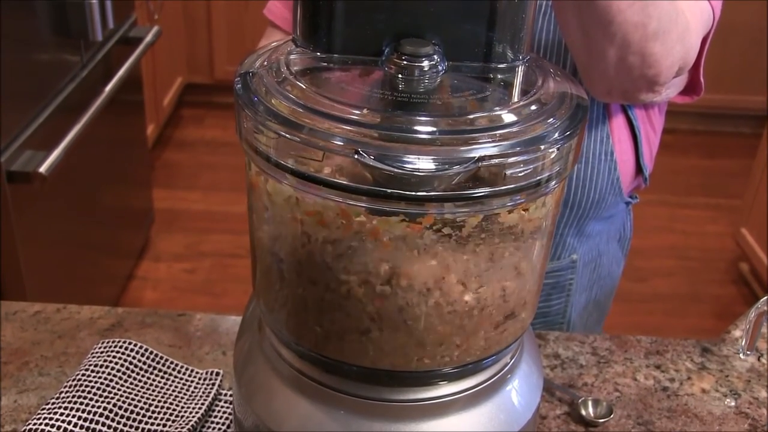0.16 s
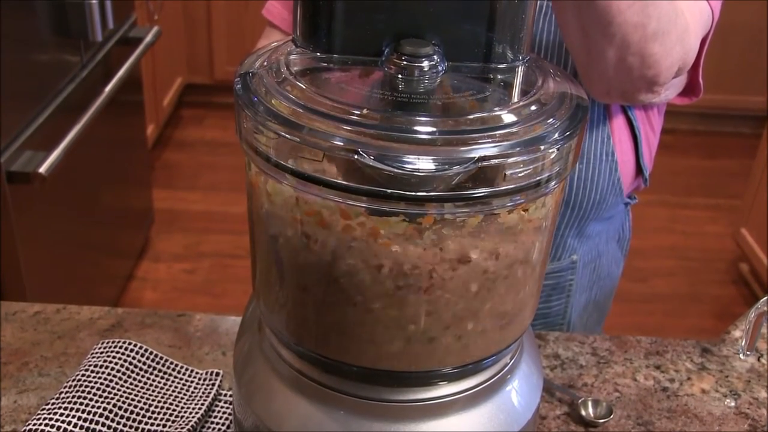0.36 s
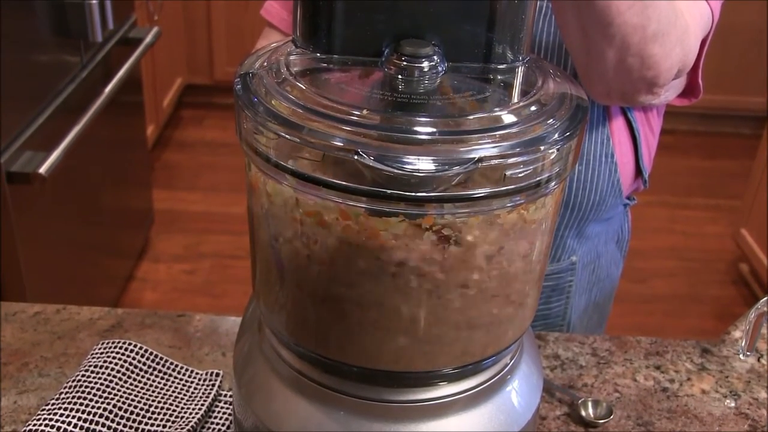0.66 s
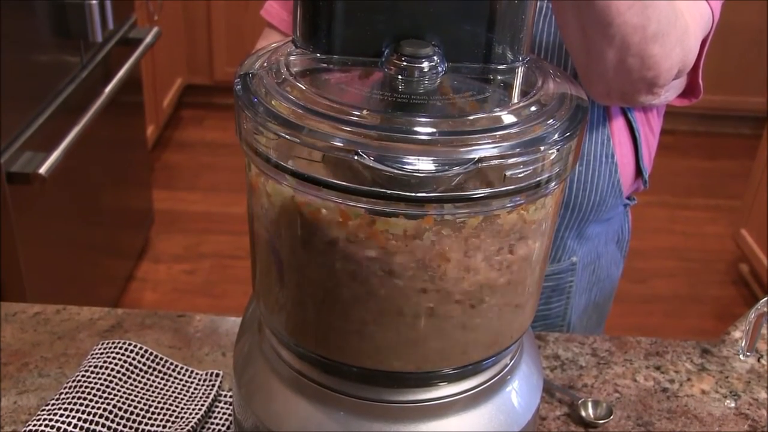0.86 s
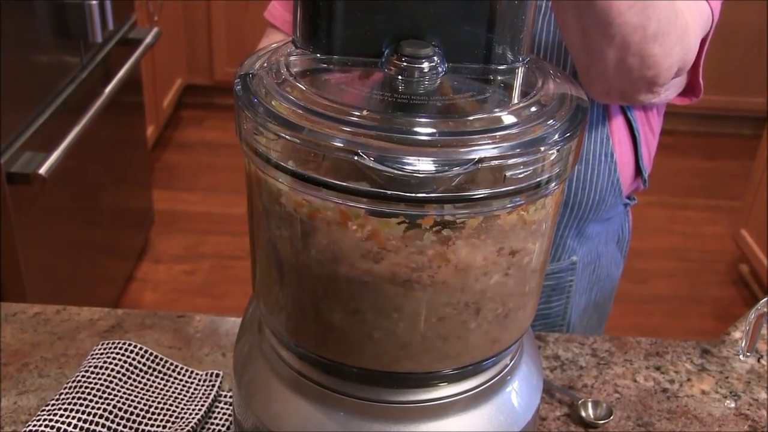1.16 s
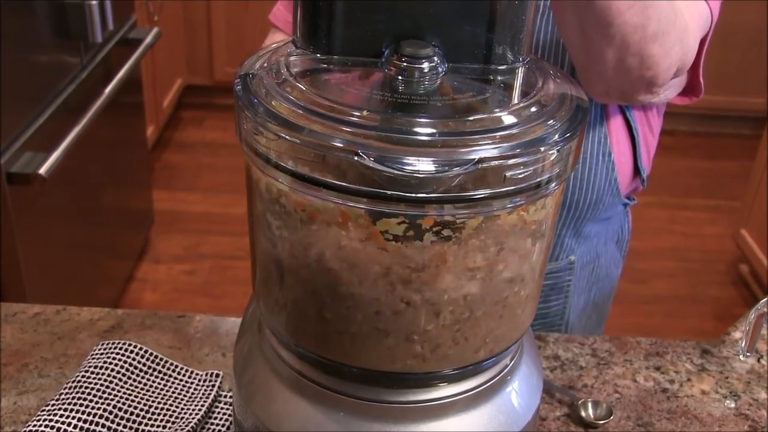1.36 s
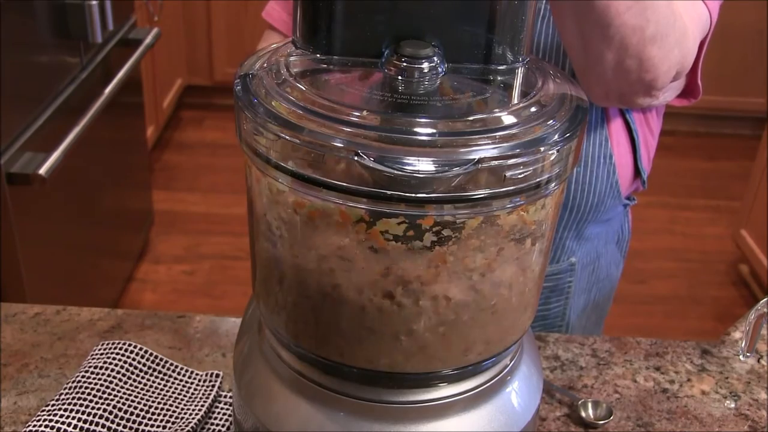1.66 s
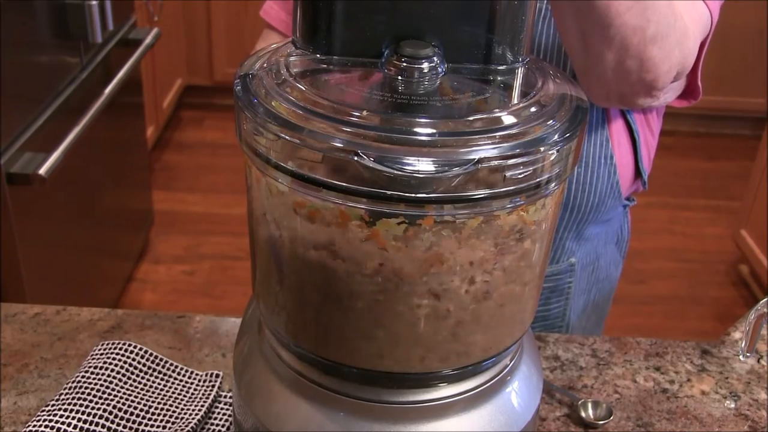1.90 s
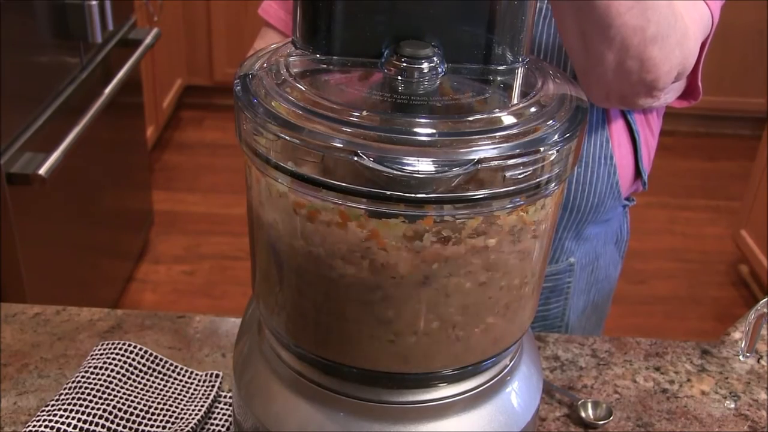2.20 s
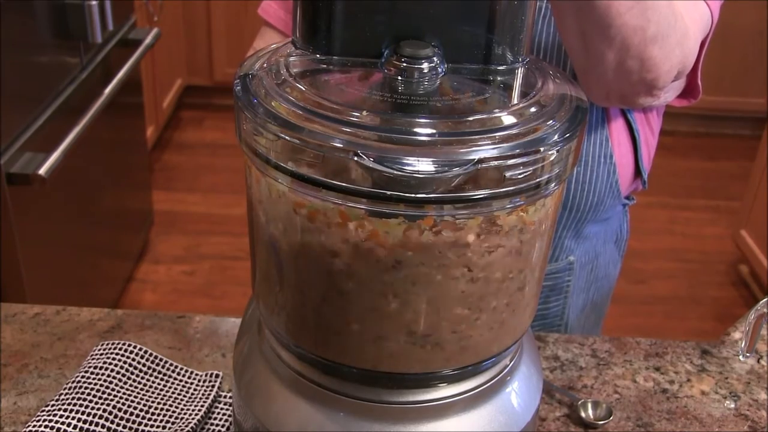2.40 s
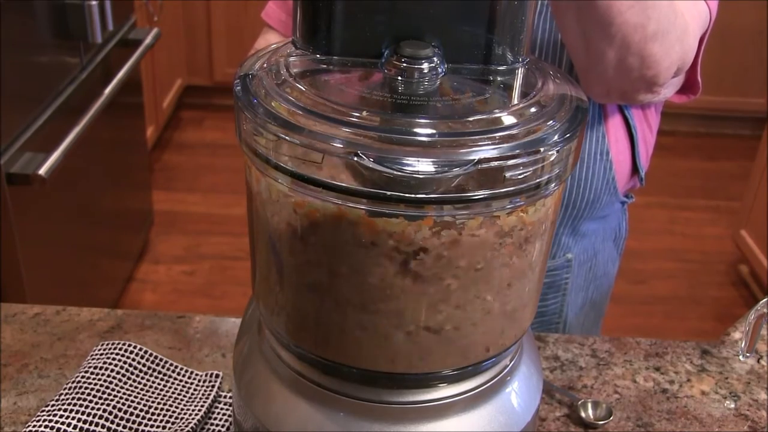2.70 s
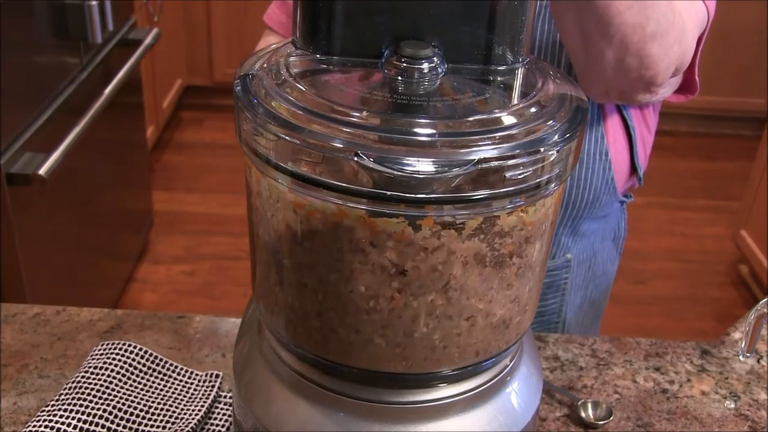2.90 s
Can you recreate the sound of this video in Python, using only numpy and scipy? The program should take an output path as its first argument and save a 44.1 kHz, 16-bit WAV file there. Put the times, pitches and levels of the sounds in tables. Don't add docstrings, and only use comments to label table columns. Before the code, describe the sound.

A food processor, close and centred in a reverberant kitchen. An earlier pulse fades; a button clicks at 0.1 s, a relay faintly fizzes and the motor scrapes into motion at 0.2. Rough, fluttering churning, hiss, ticking bits and knocks run until 1.4, then coast down. Another click at 1.6 and a ringing kick at 1.7 start a second burst, with heavier cracks and thuds, stopping quickly near 2.8, leaving room echo.

```python
import sys
import numpy as np
from scipy import signal
from scipy.fft import rfft, irfft, next_fast_len
from scipy.io import wavfile
from scipy.ndimage import uniform_filter1d

SR = 44100
rng = np.random.default_rng(int(sys.argv[2]) if len(sys.argv) > 2 else 0)


def gain_from_decibels(decibels):
    exponent = np.asarray(decibels, float) / 20
    return 10 ** exponent


def persist_wave(psi):
    counts = np.round(np.clip(psi, -1, 1) * 32767).astype(np.int16)
    wavfile.write(sys.argv[1], SR, np.atleast_2d(counts).T)


N = 134505
LEAD = 22050
T = (np.arange(N + LEAD) - LEAD) / SR

# time in seconds, load in dB, hardness of the hiss in dB.
RUNS = [
    [(0.24, -22, -8.5), (0.292, -20.5, -7), (0.37, -21, -6.5), (0.398, -14.5, -23), (0.49, -23, -7),
     (1.004, -19, -11), (1.194, -22.5, -7), (1.214, -18.5, -11), (1.41, -20.5, -15)],
    [(1.735, -19.5, -9.5), (2.047, -18.5, -14), (2.099, -20.5, -15), (2.123, -20, -16), (2.223, -19.5, -10),
     (2.235, -17.5, -14), (2.251, -20.5, -11), (2.751, -17.5, -9), (2.785, -23.5, -6.5)],
]
# time to fall 60 dB in seconds, one per pulse.
COAST_T60 = [0.44, 0.2]
EARLIER_STOP_S, EARLIER_DB = -0.13, -22

# start in seconds, level in dB.
BUTTON_PRESSES = [
    (0.091, -24),
    (1.577, -25),
]
# start in seconds, level in dB.
RELAY_CLOSINGS = [
    (0.1466, -35.5),
    (1.6308, -32.5),
]
# start in seconds, level in dB.
MOTOR_KICKS = [
    (0.209, -5.5),
    (1.689, 1),
]
KICK_BASE_DB = [9.5, -1.5]

# pitch in Hz, level in dB, time to fall 60 dB in seconds.
BUTTON_NOTES = [(437, -13, 0.042), (750, -3, 0.022), (1076, -1, 0.025), (1280, -3.5, 0.041),
                (1500, -9, 0.023), (2060, 0, 0.039), (2270, -13, 0.025), (3500, -20, 0.019)]
# pitch in Hz, level in dB, width in Hz.
RELAY_BANDS = [(5200, 0, 400), (6640, -3, 600), (8060, -5, 500), (9800, -4, 900), (11600, -4, 900),
               (13200, -8, 900)]
# pitch in Hz, level in dB, time to fall 60 dB in seconds.
KICK_NOTES = [(247.7, -3.5, 0.16), (723, 5, 0.058), (780, -8.5, 0.056), (1270, -9, .03), (1710, 6.5, 0.013),
              (1900, -5, 0.02), (2780, 6, 0.0083), (2910, -3, 0.0082), (4260, -4, 0.024)]
# pitch in Hz, width in Hz, level in dB.
BOWL_NOTES = [(223.5, 30.7, -5.5), (245.4, 13.2, -5), (278, 20, -3), (466.5, 51, -9), (580, 26.6, -2.5),
              (774.7, 25, -1.5), (1133.5, 72, -2), (1287, 75, -3), (1718, 93, -7.5), (1942, 135, -9.5),
              (2950, 524, -15)]
# frequency in Hz, level in dB per Hz.
SLOSH_TONE = [(18, -79), (30, -58), (80, -37), (244, -6), (372, -15), (755, -6), (931, -9), (1150, -2),
              (8420, -28.5), (15800, -45.5)]
# pitch in Hz, level under load in dB.
MOTOR_HUM = [(118.5, -26.5), (149, -23.5), (209, -37), (247, -15.5), (268, -26), (297, -31), (742, -18),
             (1141, -17), (1287, -21.5)]

# start in seconds, level in dB, pitch in Hz.
FIRST_CHIPS = [(0.2374, -27, 3660), (0.2692, -16, 3560), (0.3353, -36, 4000), (0.3555, -29, 4600),
               (0.372, -15.5, 7540), (0.4456, -15.5, 3670), (0.5257, -19, 3560), (0.7157, -25, 3640),
               (0.824, -21, 3520), (0.9298, -21, 3560), (1.0385, -17.5, 3600), (1.1453, -19, 6500),
               (1.182, -21, 4130), (1.2192, -12.5, 7740), (1.3103, -16, 3530)]
# start in seconds, level in dB, pitch in Hz.
LAST_CHIPS = [(1.735, -28, 3760), (1.7608, -14, 3580), (1.864, -30, 3700), (1.9303, -19.5, 5130),
              (1.9648, -28, 3540), (2.0336, -24, 4370), (2.1663, -15.5, 3800), (2.217, -25, 3820),
              (2.317, -27, 4270), (2.39, -12.5, 3520), (2.4916, -17, 4600), (2.5485, -16.5, 5030),
              (2.5998, -37, 4120), (2.6387, -17.5, 4860), (2.7704, -32, 4540)]
# start in seconds, level in dB, pitch in Hz.
CRACKS = [(0.3055, -21, 2780), (0.41, -19, 2000), (0.4813, -18, 2960), (0.76, -11.5, 2770),
          (0.801, -19, 2700), (0.914, -19, 2600), (0.9963, -20, 3490), (1.0597, -9.5, 2770),
          (1.1109, -12.5, 2370), (1.266, -16, 3240), (1.998, -13, 2840), (2.1337, -19, 1960),
          (2.1772, -14, 2120), (2.2281, -9, 2240), (2.354, -13.5, 2760), (2.458, -7, 2040),
          (2.5182, -6, 2900), (2.6377, -11, 2150), (2.6922, -7.5, 2900), (2.728, -10, 3450),
          (2.7797, -16, 3000)]
# start in seconds, level in dB.
THUDS = [(0.26, -9), (0.394, -2), (0.429, -28), (1.069, -6), (1.219, -19), (1.761, -0.5), (1.847, -19),
         (1.989, 0), (2.039, -4), (2.177, -3), (2.231, -5.5), (2.501, 0), (2.689, -19), (2.729, -5),
         (2.754, -14)]

# frequency in Hz, time to fall 60 dB in seconds.
ROOM_T60 = [(125, 0.92), (500, 0.87), (2000, 0.87), (6000, 0.73), (14000, 0.5)]
# frequency in Hz, side level in dB.
ROOM_WIDTH = [(100, -12), (300, -6), (1000, -6.5), (3000, -0.5), (8000, 0), (13000, -1)]
# frequency in Hz, side level in dB.
NEAR_SCATTER = [(40, -22), (150, -24), (1000, -21), (4000, -16), (9000, -15), (14000, -18)]
# frequency in Hz, level in dB.
HUSH_TONE = [(25, -12), (60, -16), (130, -2), (400, 4), (1200, 0), (4000, -4), (12000, -34), (15000, -45)]


def evened(x):
    return x / np.sqrt(np.mean(x ** 2) + 1e-20)


def read(points, hz):
    f, value = np.transpose(points)
    return np.interp(np.log(hz + 1), np.log(f + 1), value)


def colour(x, points):
    size = next_fast_len(len(x))
    gain = gain_from_decibels(read(points, np.fft.rfftfreq(size, 1 / SR)))
    return irfft(rfft(x, size) * gain, size)[:len(x)]


def resonate(x, hz, width):
    return signal.lfilter(*signal.iirpeak(min(hz, SR / 2.2), hz / width, fs=SR), x)


def broad(x, hz, part):
    return resonate(resonate(x, hz, part * hz), hz, part * hz)


def smooth(size):
    return evened(uniform_filter1d(uniform_filter1d(rng.standard_normal(len(T)), size), size))


def burst(size, t60):
    t = np.arange(size) / SR
    return t, rng.standard_normal(size) * gain_from_decibels(-60 * t / t60)


def add(mix, s, sound):
    part = mix[round(s * SR) + LEAD:][:len(sound)]
    part += sound[:len(part)]


def room_hush():
    floor_db = -50
    return [gain_from_decibels(floor_db) * evened(colour(z, HUSH_TONE)) for z in rng.standard_normal((2, len(T)))]


def kitchen(x):
    room_db = -10.5
    at = np.arange(200, SR - 20, 20)
    at = at + rng.integers(0, 20, (2, len(at)))
    taps = np.zeros((2, SR))
    np.put_along_axis(taps, at, rng.choice([-1., 1.], at.shape), 1)
    hz, t, z = signal.stft(taps, SR, nperseg=256)
    fade = gain_from_decibels(-60 * t / read(ROOM_T60, hz)[:, None])
    tail = signal.istft(z * fade, SR, nperseg=256)[1]
    tail = tail / np.linalg.norm(tail[0])
    mid, side = gain_from_decibels(room_db) * signal.fftconvolve(x[None], tail, axes=1)[:, :len(T)]
    scatter = burst(size=3000, t60=.06)[1]
    near = signal.oaconvolve(x, scatter / np.linalg.norm(scatter))[:len(T)]
    return mid, colour(side, ROOM_WIDTH) + colour(near, NEAR_SCATTER)


def ring(modes, scuff_db, scuff_t60):
    t, z = burst(size=8000, t60=scuff_t60)
    notes = sum(gain_from_decibels(db - 60 * t / t60) * np.sin(2 * np.pi * (hz * t + rng.random()))
                for hz, db, t60 in modes)
    scuff = sum(gain_from_decibels(db) * broad(z, hz, .5) for hz, db, t60 in modes)
    x = (notes + gain_from_decibels(scuff_db) * scuff) * np.minimum(t / .001, 1)
    x = signal.sosfilt(signal.butter(2, [150, 5000], "band", fs=SR, output="sos"), x)
    return x / abs(x).max()


def button(out, s, db):
    add(out, s, gain_from_decibels(db + 2) * ring(BUTTON_NOTES, 0, .02))
    add(out, s + .008, gain_from_decibels(db - 6) * ring(BUTTON_NOTES[2:], 16, .22))


def relay(out, s, db):
    fizz_s, rest_db = .016, -9
    t, z = burst(size=4000, t60=1.0)
    bands = sum(gain_from_decibels(d) * resonate(z, hz, w) for hz, d, w in RELAY_BANDS)
    hiss = colour(z, [(3500, -3), (5000, -8), (12000, -12), (15000, -28)])
    fizz = evened(bands + 1.5 * hiss)
    shape = np.minimum(t / 0.0051, 1) * (gain_from_decibels(rest_db) + np.exp(-(t / fizz_s) ** 2))
    add(out, s - .003, gain_from_decibels(db - 5.5) * fizz * shape)
    ping = np.minimum(t / .002, 1) * np.sin(2 * np.pi * RELAY_BANDS[0][0] * t)
    add(out, s, gain_from_decibels(db - 1 - 60 * t / .03) * ping)


def motor_kick(out, s, db, scuff_db, bounce_db, base_db):
    windup_s, windup_db = 0.028, -35
    t, z = burst(size=2000, t60=0.93)
    wind = evened(colour(z, [(150, -8), (300, 2), (2500, -14.5), (8000, -66)]))
    add(out, s - windup_s, gain_from_decibels(windup_db) * (0.5 + np.minimum(t / windup_s, 1)) * wind)
    kick = [(hz, d + base_db * (hz < 400), t60) for hz, d, t60 in KICK_NOTES]
    add(out, s, gain_from_decibels(db - 4.0) * ring(kick, scuff_db, 0.046))
    add(out, s + .0095, gain_from_decibels(db + bounce_db) * ring(kick, scuff_db, 0.025))


def switching():
    scuff_db, bounce_db = [11.5, -1], [-2.5, -13]
    out = np.zeros(len(T))
    for press in BUTTON_PRESSES:
        button(out, *press)
    for closing in RELAY_CLOSINGS:
        relay(out, *closing)
    for (s, db), scuff, bounce, base in zip(MOTOR_KICKS, scuff_db, bounce_db, KICK_BASE_DB):
        motor_kick(out, s, db, scuff, bounce, base)
    return out


def knocks():
    out = np.zeros(len(T))
    chip_tone = [(300, -40), (1500, -18), (2500, -5), (4000, -9.5), (10000, -11), (15000, -23)]
    for s, db, hz in list(FIRST_CHIPS) + list(LAST_CHIPS):
        z = burst(size=1500, t60=0.031)[1]
        chip = broad(z, hz, .5) + 1.1 * colour(z, chip_tone)
        add(out, s, gain_from_decibels(db + 3.0) * chip / abs(chip).max())
    for s, db, hz in CRACKS:
        z = burst(size=1500, t60=0.03)[1]
        low_hz, low_width = .62 * hz, 0.15 * hz
        crack = broad(z, hz, 0.41) + 1.4 * resonate(resonate(z, low_hz, low_width), low_hz, low_width)
        add(out, s, gain_from_decibels(db - 3) * crack / abs(crack).max())
    for s, db in THUDS:
        z = burst(size=2500, t60=0.057)[1]
        thud = sum(gain_from_decibels(d) * resonate(z, hz, 2.5 * w) for hz, w, d in BOWL_NOTES if hz > 550)
        add(out, s, gain_from_decibels(db - 9.5) * thud / abs(thud).max())
    return out


def bits(load, hard, swing):
    bits_per_s, spread_db, bits_db = 700, 6, -4.5
    hits = rng.random(len(T)) < bits_per_s * swing ** 2 / SR
    size = hits * gain_from_decibels(spread_db * np.minimum(rng.exponential(1, len(T)), 4.5))
    kind = rng.integers(0, 16, len(T))
    out = np.zeros(len(T))
    for k, hz in enumerate(np.geomspace(3000, 14000, num=16)):
        tick = resonate(burst(size=900, t60=0.0068)[1], hz, 0.16 * hz)
        tick = evened(tick) * gain_from_decibels(-2.5 * np.log2(hz / 3000))
        out += signal.oaconvolve(size * (kind == k), tick)[:len(T)]
    return gain_from_decibels(bits_db) * load * hard * evened(out)


def power():
    on = 1.0 * (T < EARLIER_STOP_S)
    for kick, run in zip(MOTOR_KICKS, RUNS):
        on = on + (T > kick[0]) * gain_from_decibels(-800 * np.maximum(T - run[-1][0], 0))
    return on


def motor():
    waver, flutter_db, rumble_db = .015, 4, -52
    hum = np.zeros(len(T))
    for hz, db in MOTOR_HUM:
        turns = np.cumsum(hz * (1 + waver * smooth(size=1500))) / SR
        hum += gain_from_decibels(db + flutter_db * smooth(size=1200)) * np.sin(2 * np.pi * turns)
    shake = colour(rng.standard_normal(len(T)), [(25, 19), (45, -9), (75, -20), (92, 0), (110, -28)])
    return hum + gain_from_decibels(rumble_db) * evened(shake)


def controls():
    load = gain_from_decibels(EARLIER_DB - 132 * np.maximum(T - EARLIER_STOP_S, 0))
    hard = np.full(len(T), -13.)
    for run, (kick_s, _), t60 in zip(RUNS, MOTOR_KICKS, COAST_T60):
        s, db, hard_db = np.transpose(run)
        after = np.maximum(T - s[-1], 0)
        up = np.clip((T - kick_s) / (s[0] - kick_s), 0, 1)
        load = load + (T > kick_s) * (0.33 + 0.55 * up) * gain_from_decibels(np.interp(T, s, db) - 60 * after / t60)
        hard = np.where(T > kick_s, np.interp(T, s, hard_db) - 16 * (T < s[0]) - 30 * after, hard)
    return load, gain_from_decibels(hard)


def blade():
    turns_per_s, blade_depth, turn_depth, lumps_db = 29.6, 0.13, 0.095, 1.0
    turns = np.cumsum(turns_per_s * (1 + 0.018 * smooth(size=3000))) / SR
    track = np.interp(turns % 1, np.linspace(0, 1, num=1490), rng.standard_normal(1490))
    swing = 1 + blade_depth * np.cos(4 * np.pi * turns) + turn_depth * np.cos(2 * np.pi * turns)
    return swing * gain_from_decibels(lumps_db * smooth(size=600)), evened(track)


def bowl_ring(swing, track):
    repeat, wander_db = 0.24, 1.5
    surge_db, surge_s = [5, 1], 0.14
    loose = rng.standard_normal(len(T)) * gain_from_decibels(3.1 * np.minimum(rng.exponential(1, len(T)), 4))
    drive = swing * (repeat * track + np.sqrt(1 - repeat ** 2) * evened(loose))
    surge = np.zeros(len(T))
    for run, db in zip(RUNS, surge_db):
        since = T - run[0][0]
        surge += db * (since > 0) * np.exp(-(since / surge_s) ** 4)
    out = np.zeros(len(T))
    for k, (hz, width, db) in enumerate(BOWL_NOTES):
        level = db + surge * (700 < hz < 2100) + wander_db * smooth(size=2500)
        out += (-1) ** k * gain_from_decibels(level) * resonate(drive, hz, width)
    return evened(out)


def churn(load, hard, swing, track):
    bowl_db, coast_damp_db, slosh_db, grit_db = -2.5, -5, -8.5, 0.5
    powered = power()
    bowl = gain_from_decibels(bowl_db + coast_damp_db * (1 - powered)) * bowl_ring(swing, track)
    food = colour(rng.standard_normal(len(T)) * swing ** 0.84, SLOSH_TONE)
    slosh = gain_from_decibels(slosh_db) * evened(colour(food, [(2500, -4.5), (5000, -13.0), (15000, -1)]))
    hiss_tone = [(2000, -14.5), (3500, -4), (5000, -3.0), (12000, 3.0), (15500, -13.0)]
    grit = gain_from_decibels(grit_db) * hard * evened(colour(food, hiss_tone))
    return load * (bowl + slosh + grit + motor() * powered)


def scene():
    load, hard = controls()
    swing, track = blade()
    near = churn(load, hard, swing, track) + bits(load, hard, swing) + knocks() + switching()
    mid, side = kitchen(near)
    hush = room_hush()
    mid = near + mid + hush[0]
    side = side + .4 * hush[1]
    balance = gain_from_decibels(np.array([[.2], [-.2]]))
    return (np.array([mid + side, mid - side]) * balance)[:, LEAD:]


def band_limit(x):
    return signal.sosfilt(signal.butter(12, 15950, fs=SR, output="sos"), x)


def record(dry):
    ceiling = .62
    x = dry / (1 + (abs(dry) / ceiling) ** 4) ** .25
    x = signal.sosfilt(signal.butter(2, 60, "high", fs=SR, output="sos"), x)
    x = signal.oaconvolve(x, signal.firwin(1023, 15700, window=("kaiser", 9), fs=SR)[None], "same")
    return band_limit(x)


dry = scene()
out = record(dry)
persist_wave(out)
```